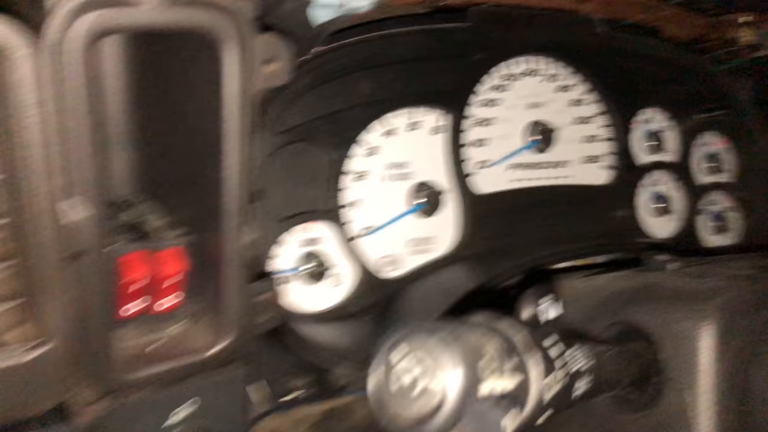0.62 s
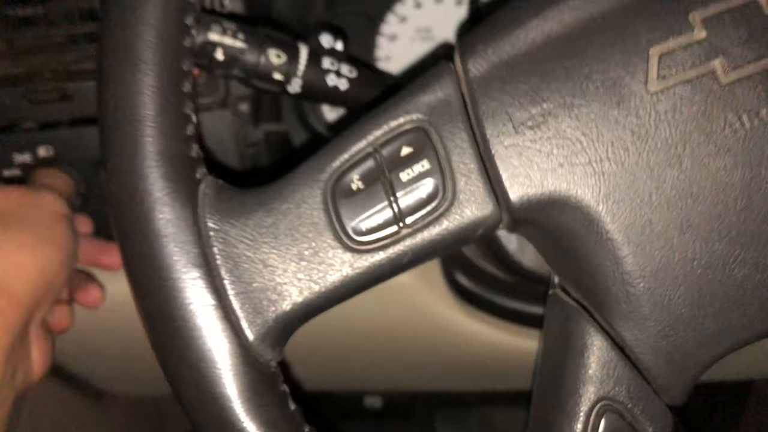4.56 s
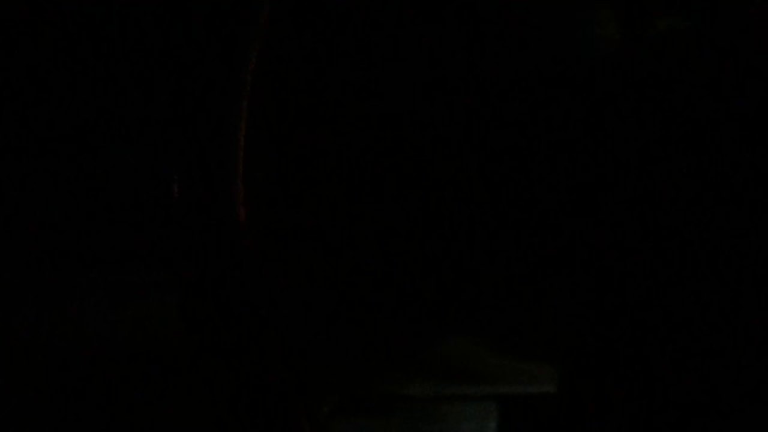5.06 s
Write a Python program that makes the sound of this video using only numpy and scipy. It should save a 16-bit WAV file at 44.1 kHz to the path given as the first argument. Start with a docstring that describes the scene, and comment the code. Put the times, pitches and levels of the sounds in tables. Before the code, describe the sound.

Loud, dry snaps of a stiff plastic knob stand out over very quiet low rumble and soft hiss inside a small parked cab. They come irregularly, bunched around two and four seconds, with light ticks, skin scrapes and low handling bumps around them. A rustling bump and a momentary drop in level come midway; afterwards everything is slightly quieter, with long pauses between clicks until a final crisp pair.

```python
"""In a parked vehicle, cab rumble and microphone hiss run throughout as quiet coloured noise.
From 0.3 s a plastic dashboard switch turns through its detents: rough noise drags, then panel modes snap and ring.
The treble comes first and the slow bending thud last. Taps, scrapes and ticks fall around the detents.
Hand and sleeve rustle and bump in between, strongest from 5.1 to 5.7 s. At 5.1 s the level dips briefly,
then stays about 4 dB lower than before. More detents follow at 6.3 s, 8.1 s and near the end."""
import sys
import numpy as np
from scipy import signal
from scipy.fft import rfft, irfft, next_fast_len
from scipy.io import wavfile
from scipy.ndimage import uniform_filter1d

SR = 44100
rng = np.random.default_rng(int(sys.argv[2]) if len(sys.argv) > 2 else 0)


def voltage_ratio(level):
    """Linear amplitude factor for a level in decibels (scalar or array-like)."""
    return 10 ** (np.asarray(level, float) / 20)


def file_out(sig):
    """Save sig as 16-bit WAV at sys.argv[1]."""
    # one column per channel
    cols = np.atleast_2d(sig).T
    # limit, then scale
    lim = np.clip(cols, -1, 1)
    pcm = np.round(lim * 32767).astype(np.int16)
    wavfile.write(sys.argv[1], SR, pcm)


N = 404838  # length in samples, about 9.2 s


def unit(x):
    """Scale a sound to an average strength (rms) of 1."""
    return x / np.sqrt(np.mean(x ** 2) + 1e-20)


def along(points, hz):
    """Read a curve of (Hz, value) points on a log pitch axis."""
    point_hz, value = np.transpose(points)
    return np.interp(np.log(hz + 1), np.log(point_hz + 1), value)


def filtered(x, response):
    """Shape a sound by a response that depends on frequency."""
    size = next_fast_len(x.shape[-1] + 8192)
    spectrum = rfft(x, size) * response(np.fft.rfftfreq(size, 1 / SR))
    return irfft(spectrum, size)[..., :x.shape[-1]]


def resonances(modes):
    """Response of a group of resonances, each (centre Hz, width Hz, dB); their signs alternate."""
    def response(f):
        total = 0
        for k, (centre, width, db) in enumerate(modes):
            total = total + (-1) ** k * voltage_ratio(db) * 1j * f * width / (centre ** 2 - f * f + 1j * f * width)
        return total
    return response


def add(track, s, sound):
    """Mix a sound into a track at time s in seconds."""
    part = track[max(round(s * SR), 0):][:len(sound)]
    part += sound[:len(part)]


def rush(spectrum, patchy_db):
    """Coloured noise of rms 1 whose loudness varies in random patches of time and pitch."""
    z = signal.stft(rng.standard_normal(N), nperseg=512)[2]
    patches = uniform_filter1d(rng.standard_normal(z.shape), 6, 0)
    patches = unit(uniform_filter1d(patches, 10, 1))
    x = signal.istft(z * voltage_ratio(patchy_db * patches), nperseg=512)[1][:N]
    return unit(filtered(x, lambda hz: voltage_ratio(along(spectrum, hz))))


def grit(modes, rough_db):
    """Stick-slip noise of rms 1: uneven, clumped grains through the resonances of what is rubbed."""
    grains = sum(unit(uniform_filter1d(rng.standard_normal(N), size=size)) for size in (40, 300))
    rough = rng.standard_normal(N) * voltage_ratio(rough_db * grains)
    return unit(filtered(rough, lambda f: resonances(modes)(f) ** 2))  # squared: passed twice


# colour of the still cab's rumble: pitch_hz [Hz], level_db [relative dB per Hz]
CAB_RUMBLE_COLOUR = [(15, -65), (25, -19.5), (75, 3), (108, -7.5), (156, -2.5), (200, -13.5), (314, -16.5),
                     (500, -19), (650, -49.5), (1100, -120)]
# colour of the microphone's hiss: pitch_hz [Hz], level_db [relative dB per Hz]
HISS_COLOUR = [(120, -36), (200, -1), (245, -3.5), (569, -10), (696, -9.5), (1980, -17.5), (2330, -18.5),
               (15100, -26), (16000, -26)]


def cab_and_hiss():
    """Steady background: low rumble of the still cab plus the microphone's hiss, both patchy noise."""
    rumble = voltage_ratio(-68.5) * rush(CAB_RUMBLE_COLOUR, patchy_db=2)
    hiss = voltage_ratio(-69.5) * rush(HISS_COLOUR, patchy_db=1.0)
    return rumble + hiss


# loudness of hand and sleeve, joined by straight lines: time_s [s], level_db [dB rms]
RUSTLE_LEVEL = [(1.8, -91), (2.0, -73.5), (2.3, -81.5), (2.48, -69), (2.56, -67), (3.02, -75.5),
                (3.15, -75.5), (3.68, -70), (3.85, -107), (4.12, -81.5), (4.5, -64.5), (5.04, -67),
                (5.075, -50.5), (5.13, -53), (5.16, -71), (5.28, -68.5), (5.4, -60.5), (5.58, -54.5),
                (5.66, -58.5), (5.7, -64.5), (5.9, -66.5), (6.2, -71), (6.6, -78.5), (7.2, -92.5),
                (8.66, -91), (8.8, -68.5), (9.1, -85)]
# colour of the rustling cloth: pitch_hz [Hz], level_db [relative dB per Hz]
CLOTH_COLOUR = [(180, -30), (300, 1.5), (366, -4.5), (565, -9), (749, -7), (2170, -8.5), (2650, -10),
                (4300, -7.5), (16000, -20)]
# low bumps through the body of the recorder and the seat: peak_s [s], level_db [dB rms at the peak]
LOW_BUMPS = [(0.0, -57), (0.39, -50.5), (1.81, -52.5), (2.17, -51), (2.52, -52.5), (2.85, -52.5),
             (3.21, -65), (3.6, -53), (4.13, -50), (4.34, -50.5), (4.66, -50.5), (4.86, -53), (5.07, -48.5),
             (5.57, -62), (5.95, -56), (6.35, -54), (6.75, -67), (7.17, -63), (8.17, -50), (8.89, -48.5),
             (9.17, -45)]
# colour of the bumps: pitch_hz [Hz], level_db [relative dB per Hz]
BUMP_COLOUR = [(18, -50), (30, -19), (85, 0), (140, -1), (187, -7), (231, -9.5), (471, -17.5), (700, -18.5),
               (910, -41.5), (1540, -120)]


def hand():
    """Cloth and skin slide; the same motion rumbles low, and single bumps swell fast and die slowly."""
    rise_db_per_s, fall_db_per_s = 189.5, 88
    t = np.arange(N) / SR
    rustle_db = np.interp(t, *np.transpose(RUSTLE_LEVEL))
    fibres = voltage_ratio(0.53 * unit(uniform_filter1d(rng.standard_normal(N), 150)))  # fine flicker
    rustle = voltage_ratio(rustle_db) * unit(fibres * rush(CLOTH_COLOUR, patchy_db=0.7))
    # the low shake is -59.5 dB when the rustle is -63.5 dB, and follows it by 0.41 dB per dB
    shake = voltage_ratio(-59.5 + 0.41 * (rustle_db + 63.5))
    for peak_s, db in LOW_BUMPS:
        away_db = np.minimum(rise_db_per_s * (t - peak_s), fall_db_per_s * (peak_s - t))
        shake = np.maximum(shake, voltage_ratio(db + away_db))  # the louder of the two wins
    return rustle + shake * rush(BUMP_COLOUR, patchy_db=3.0)


# short scrapes: start_s [s], length_s [s], low_grit_db [dB], middle_over_low_db [dB]
SCRAPES = [(0.09, 0.047, -67, -8), (0.158, 0.076, -69.5, -18), (1.892, 0.095, -64.5, -13),
           (2.288, 0.055, -65, -10.5), (2.967, 0.05, -72, -17), (3.533, 0.086, -59.5, -3),
           (4.27, 0.063, -58, -1.5), (4.539, 0.05, -64.5, 6), (4.611, 0.041, -57.5, 2.5),
           (4.799, 0.064, -65, -4.5), (4.924, 0.027, -62.5, -8.5), (5.06, 0.08, -58, 1.5),
           (5.94, 0.086, -66.5, -10), (6.127, 0.063, -71, -8), (6.18, 0.037, -64.5, -3),
           (6.56, 0.034, -74, 3), (7.43, 0.046, -72, -3), (8.288, 0.045, -60, -1.5),
           (8.5, 0.14, -74.5, -14.5), (8.817, 0.057, -58, 0.3), (8.93, 0.065, -65, -18),
           (9.053, 0.05, -64.5, -6)]
# resonances of the low, middle and high grit, one list each:
# pitch_hz [Hz], width_hz [Hz], level_db [dB, for one of two passes]
GRIT_BANDS = [
    [(800, 250, 0), (1350, 450, -1)],
    [(2050, 500, -5), (2800, 420, 0), (4500, 1300, -4)],
    [(7500, 4000, 0), (12000, 7000, 0)],
]


def rubs():
    """Short scrapes of finger and knob, and at 5.06 s a hand rubbing the microphone, swell and fade; a brighter
    one has more middle and high grit."""
    level = np.zeros((3, N))
    for start_s, length_s, low_db, bright_db in SCRAPES:
        swell = np.sin(np.linspace(0, np.pi, round(length_s * SR))) ** 0.5
        band_db = (low_db, low_db + bright_db, low_db - 9 + 0.7 * bright_db)
        for row, db in zip(level, band_db):
            add(row, start_s, voltage_ratio(db) * swell)
    catches = voltage_ratio(2.2 * unit(uniform_filter1d(rng.standard_normal(N), size=130)))  # skin catches and slips
    return unit(catches) * sum(row * grit(modes, rough_db=2.0) for row, modes in zip(level, GRIT_BANDS))


# tiny bright ticks of skin on plastic: start_s [s], peak_db [dB], pitch_hz [Hz]
SKIN_TICKS = [(0.2848, -59.5, 5110), (0.6528, -62, 3060), (2.3178, -53.5, 11000), (3.631, -47, 3730),
              (3.952, -59, 4000), (4.3962, -50.5, 4570), (6.132, -56, 9380), (6.15, -53, 11100),
              (6.1823, -51.5, 11200), (6.576, -56, 1450), (8.0731, -58.5, 5270), (8.7539, -49.5, 12700),
              (8.7953, -58, 11000), (9.0798, -52.5, 3100)]


def ticks():
    """Skin on plastic cracks briefly: fading noise through one resonance, each with its own pitch."""
    out, t = np.zeros(N), np.arange(SR // 25) / SR
    for start_s, peak_db, pitch_hz in SKIN_TICKS:
        band = resonances([(pitch_hz, 0.56 * pitch_hz, 0)])
        burst = rng.standard_normal(len(t)) * voltage_ratio(-60 * t / 0.019)  # falls 60 dB in 19 ms
        crack = filtered(burst, lambda f: band(f) ** 2)
        add(out, start_s, voltage_ratio(peak_db) * crack / np.abs(crack).max())
    return out


# modes of panel and switch: pitch_hz [Hz], level_db [relative dB], decay_s [s to fall 60 dB]
PANEL_MODES = [(152.7, 2, 0.32), (240.5, 1, 0.3), (334, 8.5, 0.072), (485, -5.5, 0.078),
               (618.6, -9.5, 0.14), (701, -6.5, 0.097), (859, -2, 0.079), (1103, -5.5, 0.03),
               (1190, 2.5, 0.032), (1338.5, 5, 0.02), (1433, -7.5, 0.041), (1628, -3.5, 0.041),
               (1880, 1, 0.035), (2203, 0, 0.059), (2470, 0, 0.042), (2935, 1.5, 0.059), (3225, 1.5, 0.046),
               (3642, -4.5, 0.038), (4030, -3.5, 0.045), (4566, 3, 0.013), (4983, -7, 0.036),
               (5094, -12.5, 0.012), (5630, -5.5, 0.034), (6470, -5.5, 0.026), (7330, -10.5, 0.039),
               (8620, -13.5, 0.041), (9270, -15, 0.034), (11000, -13.5, 0.025), (13440, -18.5, .015)]


def panel_rings(t, panel_hz, treble_hz):
    """Rings each mode as a fading sine; bending waves make low modes arrive late. Returns rings and rises."""
    hz, db, decay_s = np.transpose(PANEL_MODES)[:, :, None]
    level_draw, pitch_draw = rng.standard_normal((2, len(hz), 1))
    rise = 1 - np.exp(-(t / (2.13 / hz + 0.00022)) ** 2)  # 2.13 cycles plus 0.22 ms
    # where the blow lands favours the modes near two pitches
    near = sum(np.exp(-(np.log(hz / centre_hz) / .17) ** 2) for centre_hz in (panel_hz, treble_hz))
    favour_db = 13 * near
    direct = voltage_ratio(favour_db) * np.exp(-t * hz / 7)  # passes within some 7 cycles
    ring_on = voltage_ratio(-8 + favour_db / 3)  # a weaker, more even ring stays
    fade = voltage_ratio(db + 1.8 * level_draw - 60 * t / decay_s)
    tone = np.sin(2 * np.pi * hz * (1 + 0.017 * pitch_draw) * t)
    return fade * rise * (direct + ring_on) * tone, rise


# diffuse scatter in the cab after a snap: pitch_hz [Hz], decay_s [s to fall 60 dB]
CAB_DECAY = [(150, .4), (400, .21), (1000, .105), (3000, .09), (8000, .08), (15000, .06)]


def cab_scatter(length):
    """Scatter in the cab: noise coloured like the modes, fading at each pitch's own rate, as a spectrogram."""
    f, when, z = signal.stft(rng.standard_normal(length), SR, nperseg=256, noverlap=224)
    hz, db, _ = np.transpose(PANEL_MODES)
    colour_db = along([(40, -50), *np.c_[hz, db]], f)[:, None]
    return f, z * voltage_ratio(colour_db - 60 * when / along(CAB_DECAY, f)[:, None])


# centres of the four parts thud, panel, knob, snap: pitch_hz [Hz]
PART_CENTRES = [220, 950, 2500, 5200]
# borders thud | panel | knob | snap: pitch_hz [Hz]
PART_BORDERS = [450, 1700, 3400]


def snap(part_db, panel_hz, treble_hz):
    """One blow: ringing modes plus a diffuse tail, with each of the four parts set to its own peak."""
    t = np.arange(SR // 2) / SR
    rings, rise = panel_rings(t, panel_hz, treble_hz)
    f, scatter = cab_scatter(len(t))
    part = np.searchsorted(PART_BORDERS, np.transpose(PANEL_MODES)[0])
    out = np.zeros(len(t))
    for k, peak_db in enumerate(part_db):
        ring = rings[part == k].sum(axis=0)
        only_k = np.arange(len(PART_CENTRES)) == k
        share = along(np.c_[PART_CENTRES, only_k], f)[:, None] ** 2
        wash = signal.istft(scatter * share, SR, nperseg=256, noverlap=224)[1][:len(t)]
        wash = wash * rise[part == k][0]
        both = ring / np.linalg.norm(ring) + voltage_ratio(-11) * wash / np.linalg.norm(wash)
        out += voltage_ratio(peak_db) * both / np.abs(both).max()
    return out


# detent snaps: start_s [s], panel_peak_db [dB], snap_over_panel_db [dB], drag_db [dB rms at its loudest],
# panel_pitch_hz [favoured, Hz], treble_pitch_hz [favoured, Hz]
DETENT_SNAPS = [(0.354, -19.5, -10, -53, 1310, 2280), (1.765, -20, -13, -52, 1190, 2640),
                (2.109, -18.5, -5, -55, 1084, 3300), (2.426, -25, -6, -54.5, 880, 2670),
                (2.801, -24.5, -3, -53.5, 774, 3050), (4.093, -21, -3.5, -56, 936, 2570),
                (4.445, -29, -9, -53, 1380, 3040), (6.269, -27.5, -3.5, -51, 782, 2270),
                (8.146, -18.5, 3.5, -52.5, 1480, 4960), (8.851, -26.5, -11.5, -56.5, 940, 1950),
                (9.13, -17.5, 11.5, -54, 1026, 5000)]
# fingers and knob tapping the panel: start_s [s], panel_peak_db [dB], snap_over_panel_db [dB],
# thud_peak_db [dB], panel_pitch_hz [favoured, Hz], treble_pitch_hz [favoured, Hz]
PANEL_TAPS = [(0.317, -52, -20.5, -59, 700, 2280), (1.729, -48.5, -16.5, -57, 783, 2850),
              (1.986, -55.5, 2.5, -55, 990, 4170), (2.4113, -30.5, -25.5, -48.5, 820, 2980),
              (2.434, -32, -20.5, -48, 750, 2900), (2.51, -54, 2, -56, 510, 4100),
              (3.185, -52, -2, -55, 1060, 1920), (3.587, -34.5, -9.5, -40.5, 1110, 2020),
              (4.286, -38, -15, -60, 730, 2360), (4.314, -35, -10, -40, 1340, 1990),
              (4.565, -55, -9, -53, 900, 2800), (4.518, -45, -15, -48, 880, 2250),
              (4.641, -43.5, -13, -42, 1190, 2660), (4.683, -53, -8, -46, 500, 2520),
              (4.727, -54, -3.5, -61, 1700, 1890), (5.082, -36, 0, -40.5, 730, 2470),
              (5.937, -43.5, -2.5, -41.5, 1240, 2040), (8.129, -52, -15, -58, 900, 2500),
              (8.316, -45.5, -5.5, -45.5, 762, 2660), (8.697, -42, -14, -49, 1250, 1920),
              (8.755, -57, -5, -60, 1000, 2500), (9.111, -41, -14.5, -52, 1400, 1900)]
# resonances of the drag: pitch_hz [Hz], width_hz [Hz], level_db [dB, for one of two passes]
DRAG_BANDS = [(820, 840, 1.5), (1400, 1800, 1.5), (2900, 1500, 2), (4700, 5400, -7), (9300, 4700, -9.5)]


def switch():
    """Each detent drags ever louder, snaps and runs out.

    A few milliseconds of faint treble noise rise before every snap and tap, as pre-echo."""
    build_s, run_out_s, pre_echo_s = 0.026, 0.017, 0.006
    out, drag, pre_echo = np.zeros(N), np.zeros(N), np.zeros(N)
    after = np.arange(SR // 10) / SR
    before = after[::-1]  # seconds left until the snap
    lead_s = len(before) / SR
    blows = list(PANEL_TAPS)
    for s, panel_db, bright_db, drag_db, *favoured_hz in DETENT_SNAPS:
        thud_db = -33.5 + 0.35 * (panel_db + 20)  # a harder detent thuds more
        blows.append((s, panel_db, bright_db, thud_db, *favoured_hz))
        add(drag, s - lead_s, voltage_ratio(drag_db) * np.exp(-(before / build_s) ** 2))
        add(drag, s, voltage_ratio(drag_db) * np.exp(-(after / run_out_s) ** 2))
    for s, panel_db, bright_db, thud_db, panel_hz, treble_hz in blows:
        knob_db = panel_db - 3.5 + 0.45 * bright_db
        snap_db = panel_db + bright_db
        add(out, s, snap([thud_db, panel_db, knob_db, snap_db], panel_hz, treble_hz))
        pre_echo_db = min(snap_db, knob_db) - 27.5
        add(pre_echo, s - lead_s, voltage_ratio(pre_echo_db) * np.exp(-before / pre_echo_s))
    return out + drag * grit(DRAG_BANDS, rough_db=2.0) + pre_echo * grit(GRIT_BANDS[-1], rough_db=4.5)


def scene():
    """Cab rumble and hiss, hand, rubs, ticks and switch in one channel."""
    return (cab_and_hiss() + hand() + rubs() + ticks() + switch())[None]


# level of the whole sound; the first and last values hold outside the table: time_s [s], level_db [dB]
LEVEL_DIP = [(5.10, 0.5), (5.134, -9), (5.14, -27), (5.155, -3.5)]


def level_dip(dry):
    """The whole level dips briefly once, then stays lower than it was before."""
    return dry * voltage_ratio(np.interp(np.arange(N) / SR, *np.transpose(LEVEL_DIP)))


def roll_off(x):
    """The treble ends steeply here."""
    return signal.sosfilt(signal.butter(12, 16840, fs=SR, output="sos"), x)


def record(dry):
    """The level dips; the microphone weakens the deepest bass (35 Hz, twice) and cuts the top at 15900 Hz."""
    band = lambda hz: (hz < 15900) * (1j * hz / (1j * hz + 35)) ** 2
    mix = filtered(level_dip(dry), band)
    return roll_off(mix)


dry = scene()
out = record(dry)
file_out(out)
```